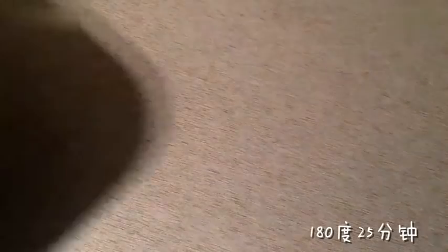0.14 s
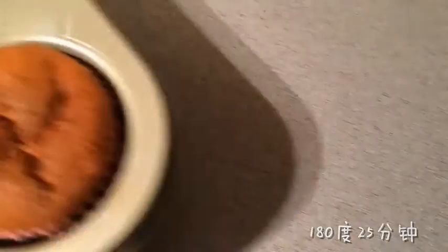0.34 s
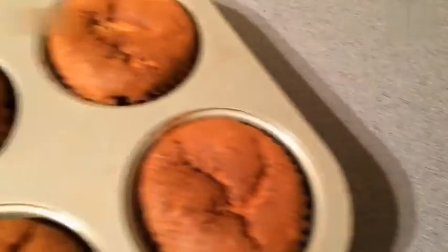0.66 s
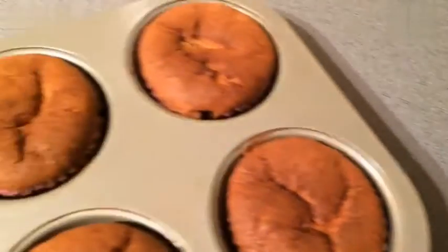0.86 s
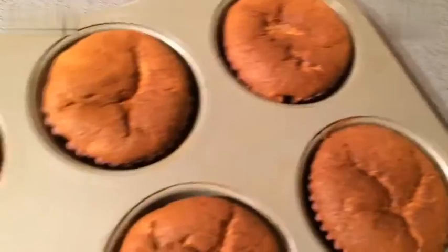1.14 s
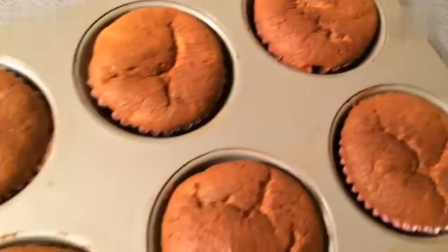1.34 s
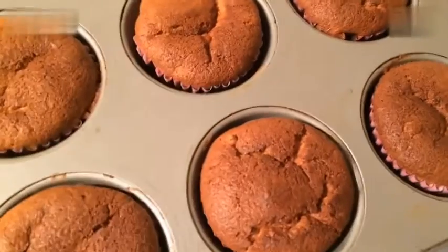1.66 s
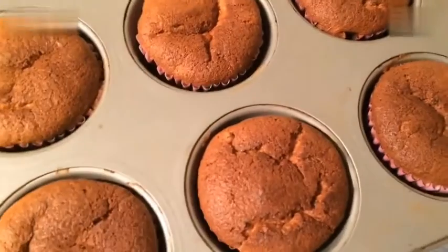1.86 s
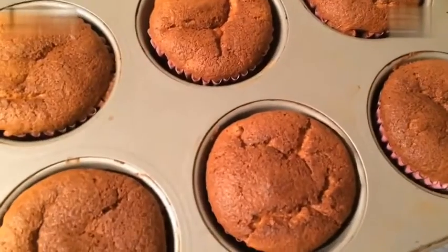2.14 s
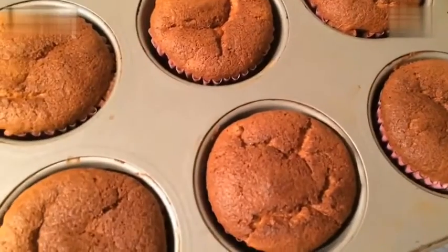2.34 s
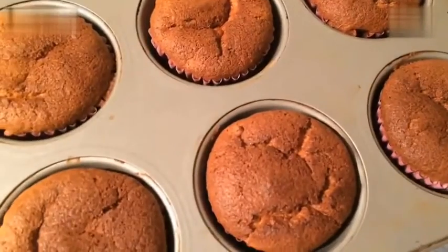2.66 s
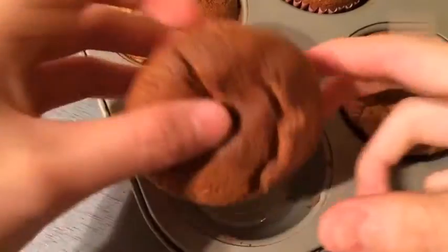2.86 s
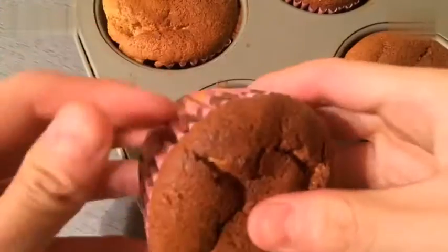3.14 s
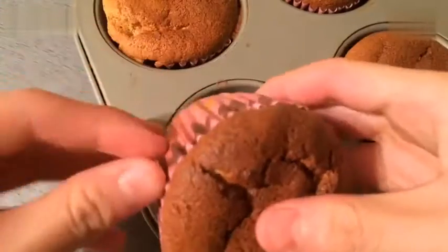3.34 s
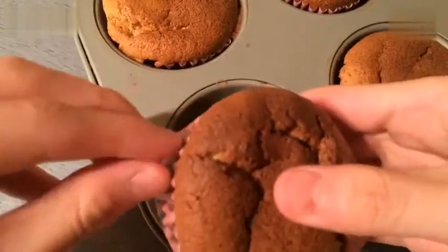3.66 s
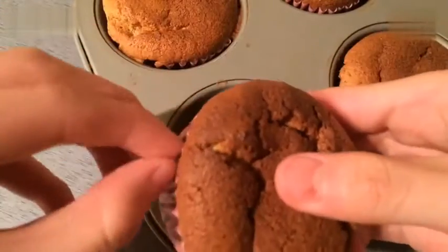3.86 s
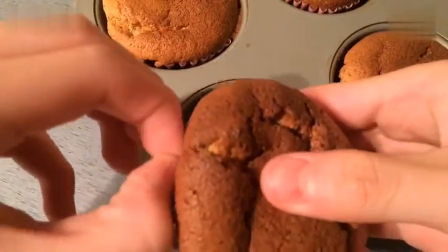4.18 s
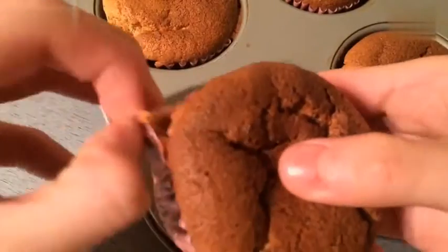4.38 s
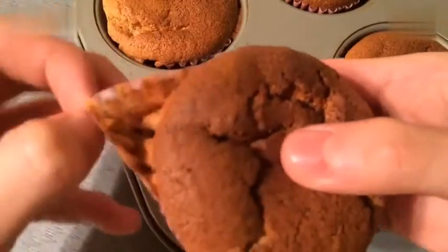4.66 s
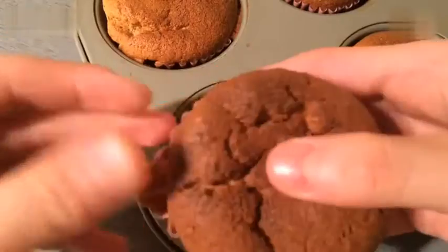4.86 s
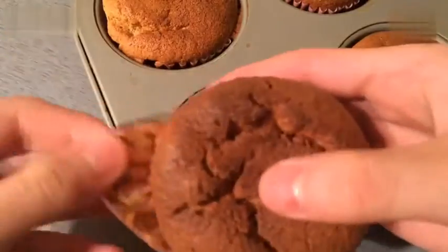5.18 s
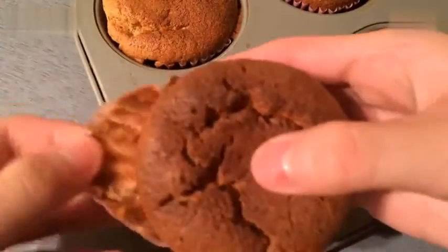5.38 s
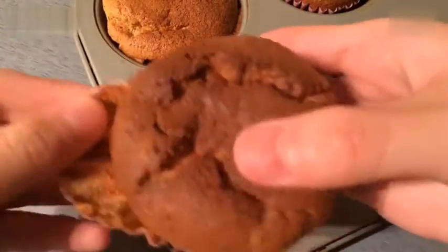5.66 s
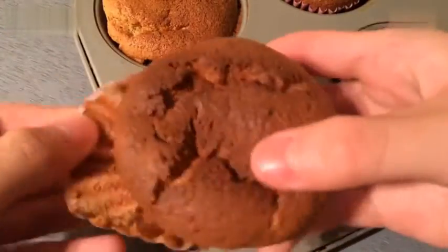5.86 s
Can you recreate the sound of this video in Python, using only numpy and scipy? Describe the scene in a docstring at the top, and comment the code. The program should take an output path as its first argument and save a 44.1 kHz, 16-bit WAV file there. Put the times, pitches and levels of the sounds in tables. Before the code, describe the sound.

After a quiet second, hard overloaded tin knocks and short slides, then faint rustling that grows into crackling, tearing paper pleats in a quiet kitchen.

```python
"""A muffin tin knocks down on a kitchen counter in quick blows, slides a little and knocks again as it settles:
ringing modes and diffuse tails excited by contact pulses, then random slips rubbing counter and sheet.
Hands rock and brush the tin, then lift a cupcake and peel its paper liner: grain noise through resonances makes
rustle and fizz, stick-slip runs make short rips, and coloured bursts make snapping pleats.
The microphone is close, so the knocks overload it; the quiet kitchen hums faintly."""
import sys
import numpy as np
from scipy import signal
from scipy.io import wavfile

SR = 44100
rng = np.random.default_rng(int(sys.argv[2]) if len(sys.argv) > 2 else 0)


def bounce(signal):
    """Save signal as a 16-bit WAV file at the path given by the first command-line argument."""
    frames = np.transpose(np.atleast_2d(signal))
    limited = np.clip(frames, -1, 1)
    pcm = np.round(limited * 32767).astype(np.int16)
    wavfile.write(sys.argv[1], SR, pcm)


N = 265041
TIME = np.arange(N) / SR


def amp(db):
    """Decibels to gain."""
    return 10 ** (np.asarray(db) / 20)


def unit(x):
    """Scales to rms 1."""
    return x / np.sqrt(np.mean(x ** 2) + 1e-20)


def read(points, hz):
    """Reads a table on a log-frequency axis."""
    f, value = np.transpose(points)
    return np.interp(np.log(hz + 1), np.log(f + 1), value)


def level(rows):
    """Gain over time between (s, dB) points; -140 dB outside them."""
    return amp(np.interp(TIME, *np.transpose(rows), left=-140, right=-140))


def add(mix, s, sound):
    """Mixes a sound in at time s, cut at the end of the mix."""
    part = mix[round(s * SR):][:len(sound)]
    part += sound[:len(part)]


def colour(x, points, size=4096):
    """Causal minimum-phase filter with the given spectrum; the result has rms 1."""
    hz = abs(np.fft.fftfreq(size, 1 / SR))
    log_gain = np.log(amp(read(points, hz)))
    spectrum = np.exp(np.conj(signal.hilbert(log_gain)))
    taps = np.fft.ifft(spectrum).real[:size // 2]
    return unit(signal.oaconvolve(x, taps)[:len(x)])


def wander(per_s):
    """Slow random drift: normal random knots, per_s of them each second, joined by straight lines."""
    knots = rng.standard_normal(N // 32)
    return np.interp(TIME * per_s, np.arange(len(knots)), knots)


def grains(per_s, spread_db):
    """Random tiny clicks of either sign and exponentially spread dB size; rms 1."""
    size = amp(spread_db * np.minimum(rng.exponential(1, N), 4))
    sign = rng.choice([-1, 1], N)
    present = rng.random(N) < per_s / SR
    return unit(size * sign * present)


def ring(modes, t):
    """Dying sines of a struck object; neighbouring modes start in opposite directions."""
    out = np.zeros(len(t))
    for k, (hz, db, t60_s) in enumerate(modes):
        out += (-1) ** k * amp(db - 60 * t / t60_s) * np.sin(2 * np.pi * hz * t)
    return out


def tail(points, rise_s):
    """Diffuse reflections that build up and die away band by band; energy 1."""
    # Decay time of the room. Each row: frequency in Hz, t60 in s.
    room_t60 = [(60, 0.545), (200, 0.11), (500, .45), (1000, 0.43), (2000, 0.16), (3500, 0.28), (8000, .26)]
    hz, t, bands = signal.stft(colour(rng.standard_normal(SR), points), SR, nperseg=512)
    decay = amp(-60 * t / read(room_t60, hz)[:, None])
    wave = signal.istft(bands * decay, SR, nperseg=512)[1][:SR]
    wave = wave * (1 - np.exp(-(np.arange(SR) / SR / rise_s) ** 2))
    return wave / np.linalg.norm(wave)


def resonate(x, hz, width_hz):
    """A fixed or moving resonance with steep skirts; the result has rms 1."""
    turn = np.exp(2j * np.pi * np.cumsum(hz * np.ones(N)) / SR)
    r = np.exp(-np.pi * width_hz / SR)
    shifted = x / turn  # resonance brought down to 0 Hz
    return unit((turn * signal.lfilter([1], [1, -2 * r, r * r], shifted)).real)


def flexing(x, modes, flex, flutter_db, per_s):
    """Resonances of a bending sheet: each drifts in pitch and strength on its own; rms 1."""
    out = np.zeros(N)
    for hz, width_hz, db in modes:
        gain = amp(db + flutter_db * wander(per_s))
        out += gain * resonate(x, hz * np.exp(flex * wander(per_s / 2)), width_hz)
    return unit(out)


def stroke(start, length, db, change_db, attack_s, release_s):
    """Gain over time of one movement: builds up to its start, holds while growing or easing, then dies away."""
    held = np.clip((TIME - start) / length, 0, 1)
    before, after = np.maximum(start - TIME, 0), np.maximum(TIME - start - length, 0)
    outside = before / attack_s + after / release_s
    return amp(db + change_db * (held - .5)) * np.exp(-np.minimum(outside, 20))


def swell(s, db, width_s):
    """Gain over time of a brief, soft contact centred on s."""
    return amp(db) * np.exp(-.5 * np.minimum(abs(TIME - s) / width_s, 10) ** 2)


def kitchen(waver_hz=0.5, air_db=-59.5):
    """Still room air as coloured noise and a faint appliance hum of sines wavering in pitch."""
    # Hum partials. Each row: frequency in Hz, rms level in dB.
    hum_partials = [(91.5, -73), (301.5, -73.5), (402, -79), (597.5, -88)]
    # Spectrum of the air. Each row: frequency in Hz, density in dB per Hz.
    air_colour = [(12, -41), (20, -14), (60, -6), (96, -1), (182, -12), (301, -13), (337, -16.5),
                  (399, -16), (738, -22.5), (1330, -21.5), (2200, -27), (2390, -28), (11100, -35.5),
                  (14700, -37.5), (16000, -49)]
    out = amp(air_db) * colour(rng.standard_normal(N), air_colour)
    for hz, db in hum_partials:
        phase = 2 * np.pi * np.cumsum(hz + waver_hz * wander(per_s=2.1)) / SR
        out += amp(db) * unit(np.sin(phase))
    return out


def knocks(boom_db=-25, boom_rise_s=.005, room_db=10, rattle_db=14, rattle_t60_s=0.21,
           chatter_db=-17, chatter_t60_s=0.066, low_hz=72):
    """Each blow makes the tin clack and rattle, the counter boom and the kitchen answer."""
    # Tin against counter. Each row: time in s, force in dB, contact time in ms,
    # rattle and room in dB, counter boom in dB (the last two relative to the force).
    blows = [(1.0135, -23.5, 0.44, -4.5, -9.5), (1.0154, 3, 0.44, -2.5, 0.5), (1.0412, -14, 0.34, 2, 5),
             (1.3362, 3.5, 0.6, -5.5, -1), (1.3464, -2.5, 0.43, 0, 2.5), (1.373, -16, 2.9, -10.5, 9),
             (1.431, -7.5, 1.07, 2.5, -2.5), (1.461, -13, 1.5, 0, -9), (2.1184, -2, 1.55, -5.5, 5),
             (2.125, 2, 0.7, -1, 1)]
    # The tin's brief clack. Each row: frequency in Hz, level in dB, t60 in s.
    tin_modes = [(349, -8.5, 0.032), (560, -4.5, 0.024), (721.8, -8, 0.062), (778, -4.5, 0.026),
                 (946, 0, 0.035), (1393, -10, 0.042), (1575, -8, 0.02), (2068.6, -12.5, 0.035),
                 (2610, -15.5, 0.036), (2954, -16, 0.037), (3650, -25, .025)]
    # Longer ring of counter and tin together. Each row: frequency in Hz, level in dB, t60 in s.
    counter_modes = [(38, -9.5, 0.11), (55, -14, .2), (67.6, -3.5, .55), (110.3, 0.5, 0.26),
                     (129, -3, 0.22), (177, -9.5, 0.41), (191.4, 2.5, 0.28), (264, -6.5, 0.26),
                     (295, -7.5, 0.29), (339, -4.5, 0.29), (360, -7.5, 0.16), (423.5, -13, .3),
                     (552, -5, 0.27), (638, -18, 0.28), (679, -3.5, 0.35), (763, -9.5, 0.19),
                     (900, -13.5, 0.57), (953, -4.5, .2), (1055.4, -8, 0.24), (1332, -12.5, .22),
                     (1465, -13.5, 0.2), (2150, -21, 0.38), (2313, -20, .35), (2710, -23, .45),
                     (4870, -28.5, .3), (8400, -27, .3)]
    # Spectrum of rattle and room. Each row: frequency in Hz, density in dB per Hz.
    room_colour = [(24, -46.5), (40, -14.5), (182, -1), (257, -4), (597, -12), (676, -12), (746, -15),
                   (956, -16), (1690, -14), (2850, -21.5), (3830, -30), (5040, -42), (15000, -65.5)]
    out, t = np.zeros(N), np.arange(SR) / SR
    clack = ring(tin_modes, t)
    boom = ring(counter_modes, t) * (1 - np.exp(-t / boom_rise_s))
    no_bass = signal.butter(3, low_hz, "highpass", fs=SR, output="sos")  # thin metal radiates little bass
    for s, force_db, contact_ms, wet_db, counter_db in blows:
        u = 2 * np.pi * 1000 * t[:512] / contact_ms
        push = u * np.exp(-u)  # a longer contact is duller
        # the rim buzzes on the counter
        chatter = amp(chatter_db - 60 * t / chatter_t60_s) * rng.standard_normal(SR)
        rattle = tail(room_colour, rise_s=.007) * amp(-60 * t / rattle_t60_s)
        diffuse = amp(room_db) * tail(room_colour, rise_s=0.0055) + amp(rattle_db) * rattle
        tin = signal.sosfilt(no_bass, clack + chatter + amp(wet_db) * diffuse)
        body = tin + amp(boom_db + counter_db) * boom
        add(out, s, amp(force_db) * signal.fftconvolve(body, push / push.sum()))
    return out


def slide(rub_trim_db=-2.0, sing_trim_db=8.0, judder_db=1.3, pressure_db=1.0):
    """Tiny slips under the tin excite the counter and the sheet's own resonances."""
    # Shoves along the counter. Each row: start in s, length in s, friction in dB and
    # singing of the sheet in dB (both before trim), change over the shove in dB.
    shoves = [(1.022, 0.21, -36, -61, -6), (1.272, 0.22, -37, -52.5, 1), (1.527, 0.36, -39.5, -57.5, 0),
              (2.125, .015, -36, -69.5, -0.5), (2.249, .125, -53.5, -75.5, 3.5)]
    # Spectrum of the friction. Each row: frequency in Hz, density in dB per Hz.
    slide_colour = [(40, -15), (108, -2.5), (175, -10.5), (350, -7), (480, -4), (860, 0), (1200, -7),
                    (1600, -12.5), (2400, -15), (3300, -27), (4000, -30), (6500, -34), (9500, -39.5),
                    (13000, -38), (15500, -44)]
    # Resonances of the rubbed sheet. Each row: frequency in Hz, width in Hz, level in dB.
    sheet_modes = [(560, 119, 5), (840, 70, 12.5), (1300, 62, 7.5), (1848, 79.5, 0), (2230, 56, 2.5),
                   (2386, 25, 2), (2980, 80, 3), (4930, 140, 0.5), (5750, 120, -3.5), (7330, 170, -6),
                   (8455, 280, -3.5), (9950, 260, -12.5), (11870, 220, -14.5), (12750, 500, -14.5),
                   (14100, 296.8, -21)]
    attack_s, release_s = .014, .022
    unevenness_db = judder_db * wander(per_s=32) + pressure_db * wander(per_s=18)
    slips = grains(per_s=1900, spread_db=0.5) * amp(unevenness_db)
    sheet = flexing(slips, sheet_modes, flex=0.00298, flutter_db=2.5, per_s=22)
    rub_gain, sing_gain = np.zeros(N), np.zeros(N)
    for start, length, rub_db, sing_db, change_db in shoves:
        rub_gain += stroke(start, length, rub_db, change_db, attack_s, release_s)
        sing_gain += stroke(start, length, sing_db, change_db, attack_s, release_s)
    rub = amp(rub_trim_db) * rub_gain * colour(slips, slide_colour)
    return rub + amp(sing_trim_db) * sing_gain * sheet


def hands(squeak_flex=.013, flick_db=6, flick_s=0.011):
    """Hands bump and rock the tin with a low rumble and brush off its rim with faint squeaks."""
    # Rocking of the tin. Each row: start in s, length in s, rumble in dB, change over the rocking in dB.
    rocks = [(1.485, 0.15, -44.5, -4), (1.962, 0.25, -43, 4.5), (2.204, 0.24, -50, -10)]
    # Soft bumps on the tin. Each row: time in s, rumble in dB.
    bumps = [(2.625, -49), (2.725, -47), (3.565, -57), (4.425, -56), (4.635, -63), (5.85, -54)]
    # Fingers brushing the rim; the skin breaks loose with a flick, then drags.
    # Each row: start in s, length in s, rubbing in dB, squeak in dB, change over the drag in dB.
    brushes = [(1.951, 0.161, -54.5, -64, -3), (2.482, 0.13, -67, -73.5, -3)]
    # Spectrum of the rubbing skin. Each row: frequency in Hz, density in dB per Hz.
    brush_colour = [(180, -30), (300, -4), (553, -4), (744, -12), (863, -1.5), (1700, -17), (1910, -15.5),
                    (3630, -17), (3940, -19.5), (8560, -17.5), (15500, -33)]
    rumble_colour = [(25, -26), (50, -17), (69, 6.5), (90, -5.5), (120, 2.5),
                     (190, -15.0), (300, -24.5), (900, -54.0)]  # Hz, dB per Hz
    squeak_modes = [(1980, 73, -1), (2260, 88, -1), (3426, 108.8, 3), (4605, 203, -6)]  # Hz, width Hz, dB
    rumble = colour(rng.standard_normal(N), rumble_colour)
    rocking = sum(stroke(*row, attack_s=0.03045, release_s=.022) for row in rocks)
    bumping = sum(swell(s, db, width_s=0.017) for s, db in bumps)
    out = rumble * (rocking + bumping)
    skin = grains(per_s=6600, spread_db=1.5)
    rub = colour(skin, brush_colour)
    squeaks = flexing(skin, squeak_modes, flex=squeak_flex, flutter_db=-5.5, per_s=30)
    for s, length, rub_db, squeak_db, change_db in brushes:
        flick = 1 + amp(flick_db) * np.exp(-abs(TIME - s) / flick_s)
        drag = stroke(s, length, 0, change_db, attack_s=.001, release_s=0.0148)
        out += drag * (amp(rub_db) * flick * rub + amp(squeak_db) * squeaks)
    return out


def fingers():
    """How hard grip, touches and pulls work the paper: gains over time of its crinkle and of its fizz."""
    # All crinkle and fizz levels are before the trims in peel().
    # A faint steady rustle of the held paper through the first part of the peeling.
    # One row: start in s, length in s, crinkle in dB, fizz in dB.
    grip = (3.05, 1.5, -78, -69)
    # Light fingertip touches on the liner. Each row: time in s, crinkle in dB, fizz of parting crumbs in dB.
    touches = [(2.625, -68, -66), (2.83, -78, -67), (3.14, -71.5, -63.5), (3.379, -64, -55),
               (3.42, -63.5, -67), (3.72, -67, -63), (3.78, -66, -63.5), (3.853, -61.5, -57),
               (3.91, -67, -68), (4.01, -63, -57.5), (4.16, -69, -62.5), (4.865, -64.5, -59.5),
               (5.13, -66, -60.5), (5.197, -63.5, -69), (5.875, -66, -66)]
    # Pulls that peel the liner off the cake.
    # Each row: start in s, length in s, crinkle in dB, fizz in dB, change over the pull in dB.
    pulls = [(3.252, 0.049, -62, -59.5, 7), (4.197, 0.2, -70, -62.5, -8), (4.433, 0.14, -64, -56, 4),
             (4.585, 0.055, -64, -59.5, -6), (4.661, 0.13, -59.5, -57, -1), (5.253, 0.032, -58.5, -69, 8),
             (5.365, 0.14, -52.5, -53, -3.5), (5.739, 0.063, -60, -61.5, 14.5)]
    attack_s, release_s = 0.0083, .022
    start, length, crinkle_db, fizz_db = grip
    moves = [(stroke(start, length, 0, 0, attack_s, release_s), crinkle_db, fizz_db)]
    for s, crinkle_db, fizz_db in touches:
        moves.append((swell(s, 0, width_s=0.013), crinkle_db, fizz_db))
    for s, length, crinkle_db, fizz_db, change_db in pulls:
        moves.append((stroke(s, length, 0, change_db, attack_s, release_s), crinkle_db, fizz_db))
    bending = np.sqrt(sum((amp(db) * shape) ** 2 for shape, db, _ in moves))
    parting = np.sqrt(sum((amp(db) * shape) ** 2 for shape, _, db in moves))
    return bending, parting


def peel(crinkle_trim_db=-1, flap_trim_db=-3, fizz_trim_db=-2.5, clump_db=3.0, scatter_s=0.00067):
    """Paper fibres buckle in clumps and ring the flexing flap, while crumbs part from the liner in a fine fizz."""
    # Spectra of crinkle and fizz. Each row: frequency in Hz, density in dB per Hz.
    crinkle_colour = [(200, -5.5), (450, 0), (750, -1), (1100, -6), (1500, -0.5), (2200, 0), (2900, -2),
                      (4200, -11), (5500, -4.5), (8000, -31)]
    fizz_colour = [(2500, -47), (4500, -1), (5500, -0.5), (7500, 0), (9500, -2.5), (13500, -6.5),
                   (16000, -6.5)]
    # Resonances of the loose flap of paper. Each row: frequency in Hz, width in Hz, level in dB.
    flap_modes = [(1100, 270, 0.5), (1690, 760, 0), (2570, 270, 0.5), (3260, 450, 4), (5250, 270, -1)]
    clumps = amp(clump_db * wander(per_s=47))
    # each fibre that gives way makes a tiny burst of noise, not a single click
    fade = np.exp(-np.arange(512) / SR / scatter_s)
    power = signal.oaconvolve(grains(per_s=3500, spread_db=1.5) ** 2, fade)[:N]
    buckles = unit(np.sqrt(abs(power)) * rng.standard_normal(N))
    crumbs = grains(per_s=7000, spread_db=4.5)
    flap = flexing(buckles, flap_modes, flex=0.081, flutter_db=2.0, per_s=110)
    bending, parting = fingers()
    crinkle = bending * (amp(crinkle_trim_db) * colour(buckles, crinkle_colour) + amp(flap_trim_db) * flap)
    fizz = amp(fizz_trim_db) * parting * colour(crumbs + 0.45 * buckles, fizz_colour)
    return clumps * (crinkle + fizz)


def snaps(crack_s=0.00079, crack_db=-11, ragged=0.058, ragged_s=0.0014, push_hz=125, push_s=0.0011):
    """A pleat flips: a sharp crack, a ragged pop of the paper and a soft push on the cake."""
    # Snapping pleats. Each row: time in s, level in dB, sharpness in dB and push on the cake in dB
    # (both relative to the level), tautness as a factor on the paper's pitch.
    flips = [(3.162, -55, 10, -30, 2.46), (3.379, -48, 4, -30, 1.66), (3.778, -49, -13, -32, 2.6),
             (3.859, -56, 12, -37, 1.7), (4.243, -51, 19, -25, 2.6), (4.298, -52, 22, -30, 2.7),
             (4.325, -58, 20, -33, 1.24), (4.329, -53, 18, -36, 1.7), (4.333, -46, 10, -28, 1.9),
             (4.456, -56, 14, -25, 1.5), (4.584, -47, -22, -30, 1.5), (4.622, -39.5, -16, -21, 0.78),
             (4.9342, -29.5, -20, 7, 0.87), (4.936, -34.5, -12, -32, 1.02), (4.973, -39, -3, 1, 1.25),
             (5.2953, -35.5, 6, -28, 0.9), (5.2966, -30.5, 9, -25, 1.67), (5.363, -28, -15.5, -34, 1.75),
             (5.3665, -31, 7, -36, 1.13), (5.4153, -31, -17, -37, 1.15), (5.462, -36.5, -11, 1, 1.05),
             (5.562, -51, 10, -32, 1.2), (5.5845, -42.5, 0, -30, 1.9), (5.6082, -20.5, -5, -27, 1.01),
             (5.623, -35, -5, 3, 0.88), (5.751, -41.5, -9, -28, 1.1), (5.76, -44, 6, -28, 1.1),
             (5.7761, -36, -14, -30, 1.06), (5.815, -39, -8, -30, 0.93)]
    # Pop of the stretched paper. Each row: frequency in Hz at tautness 1, density in dB per Hz.
    pleat_colour = [(60, -21), (180, -6), (450, -18), (750, 1), (1150, 2.5), (1650, 4), (2300, -10),
                    (2800, 0), (3600, -1.5), (4300, -19), (5600, -9), (8000, -22), (15000, -18)]
    out, t = np.zeros(N), np.arange(4096) / SR
    push = np.sin(2 * np.pi * push_hz * t) * np.exp(-t / push_s)
    for s, db, sharp_db, push_db, taut in flips:
        fibres = ragged * rng.standard_normal(len(t)) * np.exp(-t / ragged_s)  # neighbours give way too
        buckle = signal.unit_impulse(len(t)) + fibres
        pop = colour(buckle, [(hz * taut, gain_db) for hz, gain_db in pleat_colour])
        crack = amp(sharp_db + crack_db) * rng.standard_normal(len(t)) * np.exp(-t / crack_s)
        add(out, s, amp(db) * (4 * pop / np.linalg.norm(pop) + crack + amp(push_db) * push))
    return out


def rips(jitter=0.034):
    """A quick stick-slip run that stops dead when the pleat comes free."""
    # A pleat lets go of the cake in one squeaky run of slips. Each row: start in s, length in s,
    # level in dB at start, at end, slips per s at start, at end, roughness from 0 to 1.
    runs = [(3.598, 0.014, -59.5, -51.5, 4500, 3600, 0.6), (4.54, .016, -43.5, -50, 860, 275, 0.55),
            (4.936, 0.016, -46.5, -47.5, 940, 1500, 0.47), (4.952, 0.025, -39, -42, 2700, 2240, 0.5),
            (5.606, .017, -46, -52, 2500, 1700, .9)]
    # Spectrum of the rip. Each row: frequency in Hz, density in dB per Hz.
    rip_colour = [(240, -38), (400, 4.5), (653, -22.5), (809, -25), (957, -5.5), (1490, 3), (2090, -12),
                  (2710, -2.5), (3010, -8), (6780, -5), (8670, -14.5), (13700, -12.5), (15500, -12)]
    out = np.zeros(N)
    for s, length, first_db, last_db, first_hz, last_hz, rough in runs:
        rate_hz = np.interp(TIME, [s, s + length], [first_hz, last_hz])
        rate_hz = rate_hz * (1 + jitter * wander(per_s=770))
        slips = np.diff(np.floor(np.cumsum(rate_hz) / SR), prepend=0)
        regular = unit(slips - slips.mean())
        drive = (1 - rough) * regular + rough * grains(per_s=7000, spread_db=-0.5)
        out += colour(drive, rip_colour) * level([(s, first_db), (s + length, last_db)])
    return out


def scene(paper_room_db=-13):
    """The tin, then the paper close to the microphone with a little room."""
    paper = peel() + rips() + snaps()
    paper_room = tail([(200, -19), (3000, 0.5), (15000, 4.5)], rise_s=0.002)  # Hz, dB per Hz
    echo = signal.fftconvolve(paper, paper_room)[:N]
    tin = knocks() + slide() + hands()
    return (tin + paper + amp(paper_room_db) * echo + kitchen())[None]


def record(dry, edge_hz=15750):
    """The input clips at full scale; then a low-pass limits the band."""
    clipped = np.clip(dry, -1, 1)
    low_pass = signal.firwin(255, edge_hz, window=("kaiser", 8), fs=SR)
    return signal.oaconvolve(clipped, low_pass[None], "same")


dry = scene()
out = record(dry)
bounce(out)
```